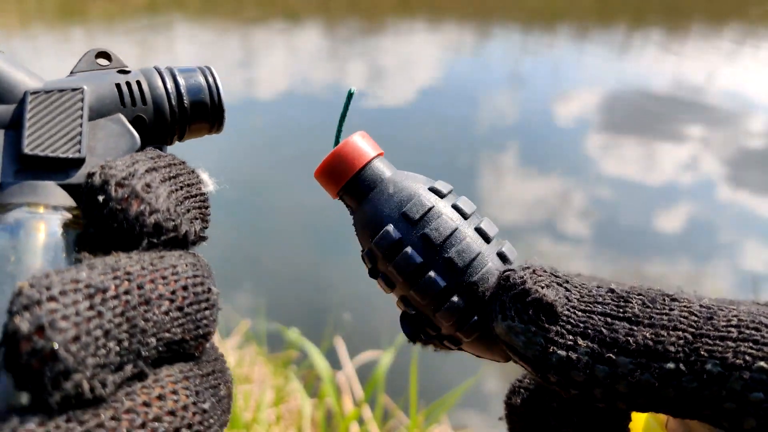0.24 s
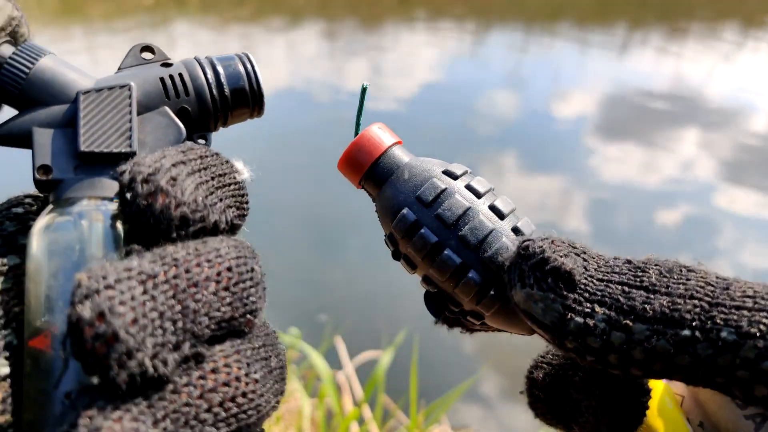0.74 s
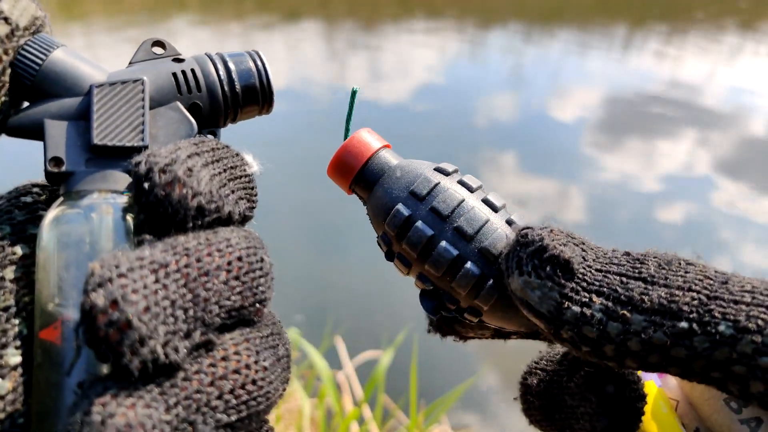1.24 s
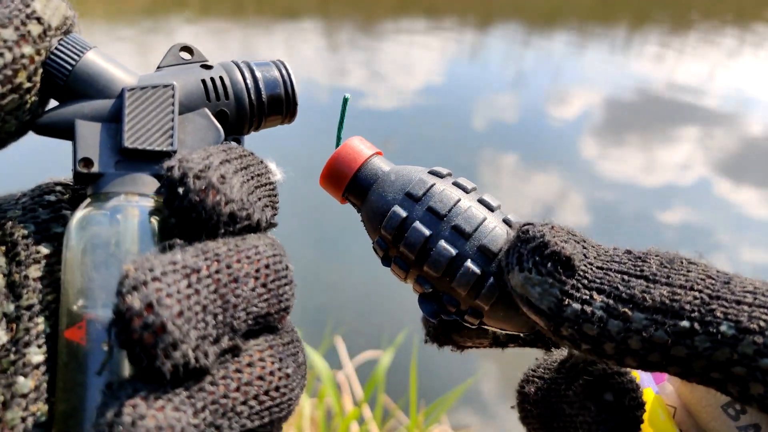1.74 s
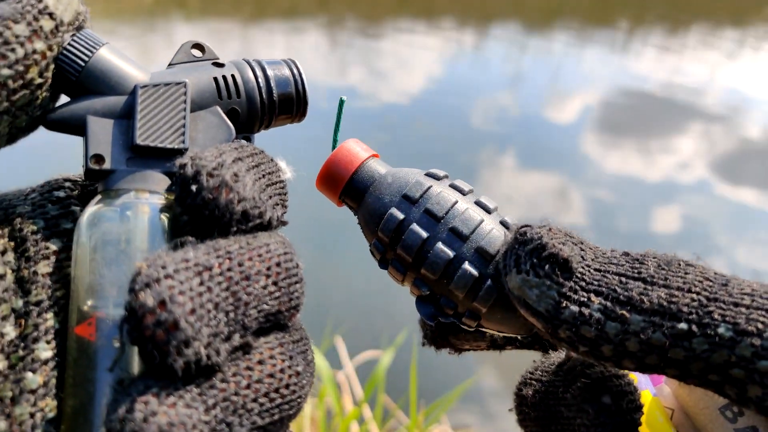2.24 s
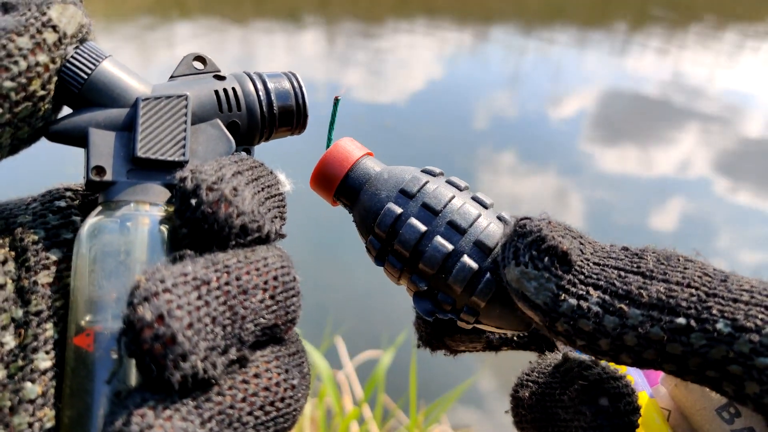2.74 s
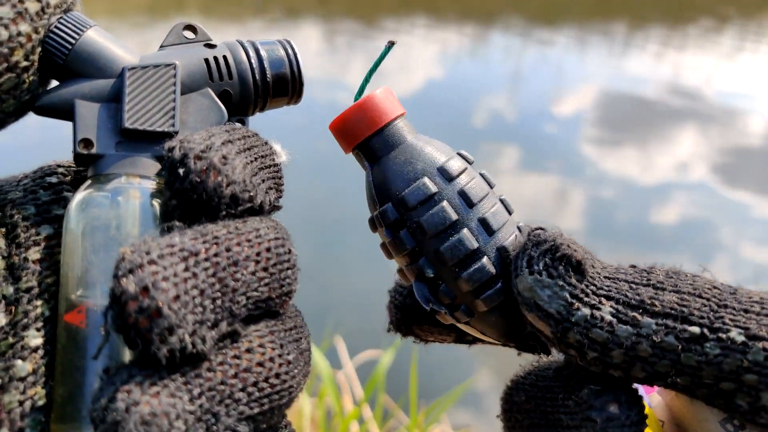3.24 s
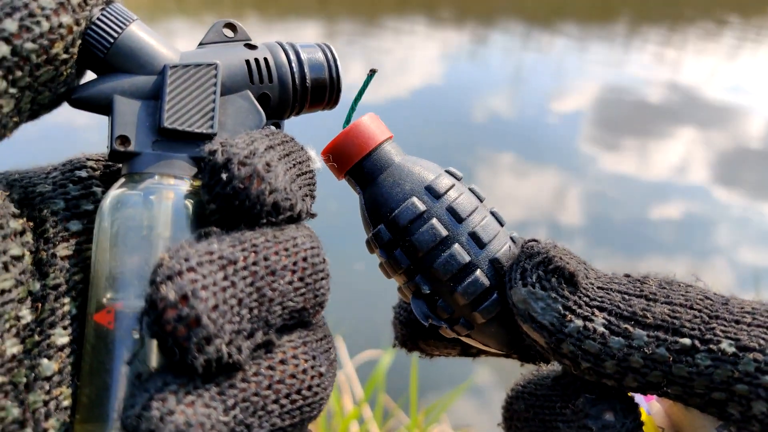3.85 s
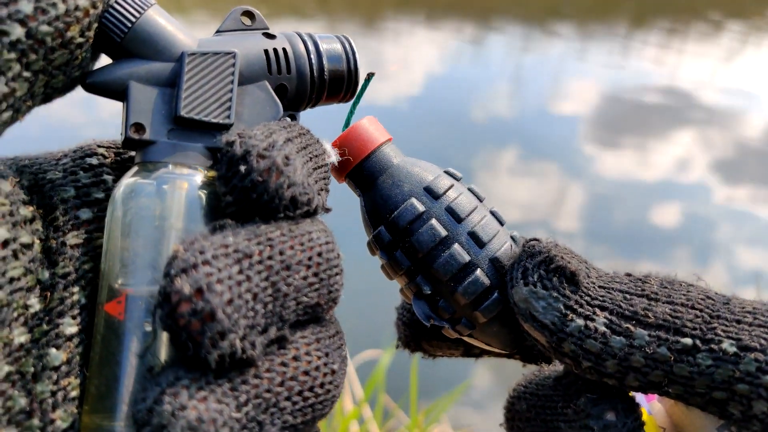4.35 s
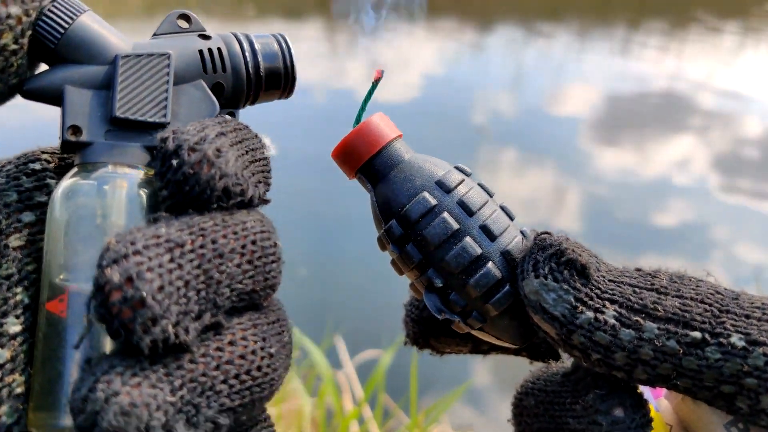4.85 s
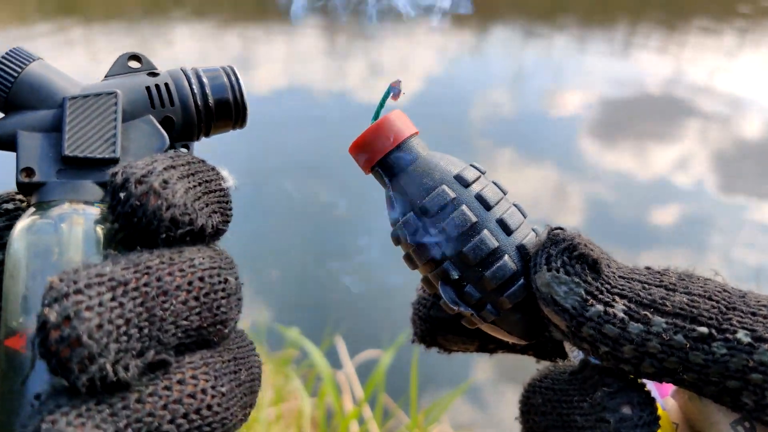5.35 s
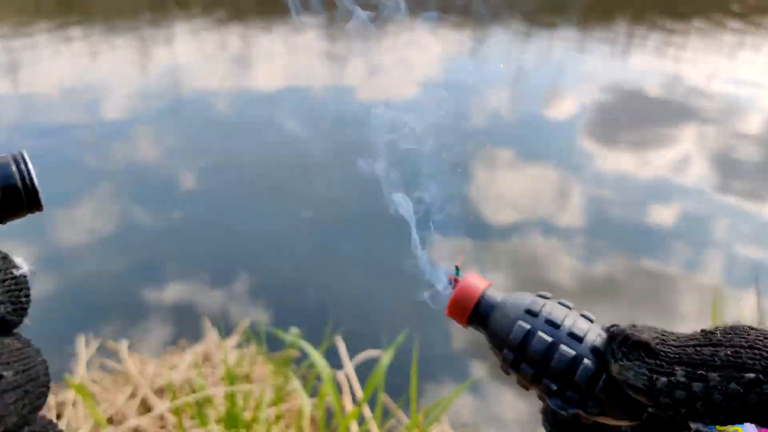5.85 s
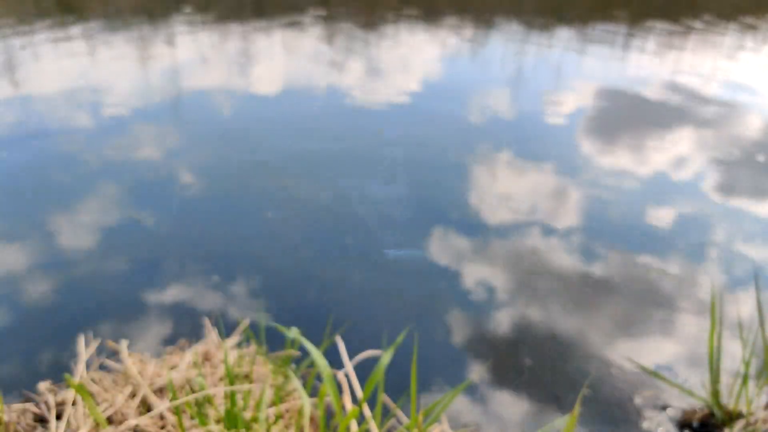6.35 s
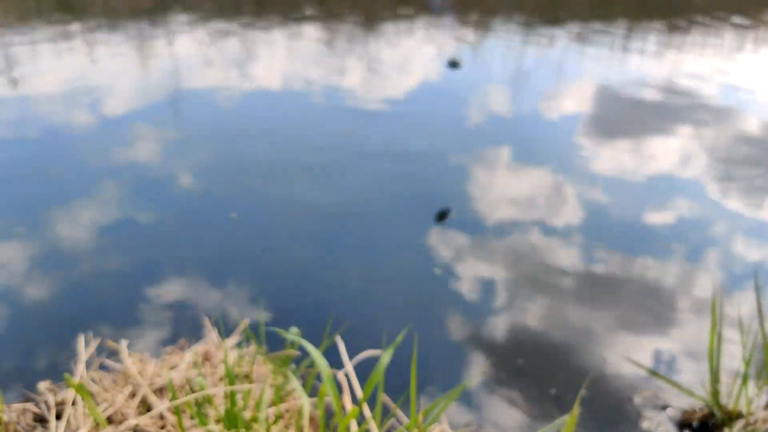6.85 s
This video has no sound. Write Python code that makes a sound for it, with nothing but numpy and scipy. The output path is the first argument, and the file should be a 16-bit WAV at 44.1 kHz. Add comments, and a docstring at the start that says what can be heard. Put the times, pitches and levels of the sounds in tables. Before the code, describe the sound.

Close outdoors, a gas torch ignites and roars, a fuse crackles and whooshes away, then a small splash, with soft wind rumble.

```python
"""On a river bank, a butane jet lighter lights the fuse of a firecracker close to a pair of microphones.
The trigger ticks ring the lighter's modes, unlit gas hisses twice as coloured noise, the igniter snaps.
The jet roars as fluttering noise and tears as dense random pops, steadier while it rests on the fuse.
The fuse fizzes in tiny pops, is swung to the right and thrown, rushing as swelling noise, then plops
into the water as noise slaps and ringing bubbles. Slow noise gusts of wind cover a far two-tone drone."""
import sys
import numpy as np
from scipy import signal
from scipy.fft import rfft, irfft, next_fast_len
from scipy.io import wavfile
from scipy.ndimage import map_coordinates

SR = 44100
rng = np.random.default_rng(int(sys.argv[2]) if len(sys.argv) > 2 else 0)


def inscribe(sig):
    """Save sig as 16-bit PCM at rate SR to the path in sys.argv[1].

    A 1-D sig is mono; a 2-D sig holds one channel per row.
    Samples are clipped to [-1, 1] before scaling.
    """
    pcm = np.round(np.clip(np.atleast_2d(sig).T, -1, 1) * 32767)
    wavfile.write(sys.argv[1], SR, pcm.astype(np.int16))


N = 313135
TIME = np.arange(N) / SR
SIZE = next_fast_len(N)
BIN_HZ = np.arange(SIZE // 2 + 1) * SR / SIZE

# jet: lit and out, then meeting and leaving the fuse, with their fade times
LIT_S, OUT_S, IGNITE_S, DIE_S = 1.144, 5.39, 0.046, 0.028
TOUCH_S, LEAVE_S, SETTLE_S = 3.46, 4.64, 0.022

# Equal spectrum at both microphones. Each row: frequency in Hz, left-right difference in dB.
EVEN_SHADE = [(20, 0), (20000, 0)]
# Likeness of the channels for a near source. Each row: frequency in Hz, shared power from 0 to 1.
NEAR_LIKENESS = [(200, 1), (1200, 0.88), (2700, 0.99), (3500, 1), (6000, 0.26), (10000, 0.5), (16000, 0.6)]


def from_db(db):
    """Decibels to gain."""
    return 10 ** (np.asarray(db) / 20)


def rms_one(x):
    """Scale to unit rms."""
    return x / np.sqrt(np.mean(x ** 2) + 1e-20)


def in_time(rows):
    """The columns of a time curve, interpolated at every sample."""
    s, *columns = np.transpose(rows)
    return [np.interp(TIME, s, c) for c in columns]


def levels(rows):
    """Gains from dB columns, dying quickly outside the curve's span."""
    outside_s = np.maximum(rows[0][0] - TIME, 0) + np.maximum(TIME - rows[-1][0], 0)
    return [from_db(db) * np.exp(-outside_s / 0.042) for db in in_time(rows)]


def at_bins(points):
    """A table over log frequency, read at every frequency bin."""
    hz, value = np.transpose(points)
    return np.interp(np.log(BIN_HZ + 1), np.log(hz), value)


def drift(rate_hz):
    """Slow random wander of rms 1."""
    spectrum = rfft(rng.standard_normal(SIZE)) / (1 + (BIN_HZ / rate_hz) ** 2)
    return rms_one(irfft(spectrum, SIZE)[:N])


def held(start_s, end_s, attack_s, release_s):
    """A gain rising smoothly around start, holding near 1 and falling around end."""
    rise = 1 + np.tanh((TIME - start_s) / attack_s)
    fall = 1 - np.tanh((TIME - end_s) / release_s)
    return rise * fall / 4


def swell(s, sigma_s):
    """A bell-shaped gain around one moment."""
    return np.exp(-.5 * ((TIME - s) / sigma_s) ** 2)


def coloured(source, colour, likeness, shade):
    """A source given a spectrum, each microphone adding scattered sound of its own; rms 1."""
    alike = np.clip(at_bins(likeness), 0, 1)
    scattered = rfft(rng.standard_normal((2, SIZE)))
    pair = np.sqrt(alike) * rfft(source, SIZE) + np.sqrt(1 - alike) * scattered
    side_db = at_bins(shade) * np.array([[.5], [-.5]])
    return rms_one(irfft(pair * from_db(at_bins(colour) + side_db), SIZE)[:, :N])


def turbulence(colour, likeness, shade=EVEN_SHADE):
    """Stereo noise of a given spectrum, partly shared by the channels; rms 1."""
    return coloured(rng.standard_normal(N), colour, likeness, shade)


def crackle(per_s, spread_db):
    """One-sided pressure pops at random moments, a few much larger than the rest; rms 1."""
    pops = (rng.random(N) < per_s / SR) * from_db(spread_db * np.minimum(rng.exponential(1, N), 4))
    return rms_one(pops.mean() - pops)


def place(pair, lag_ms, pan_db):
    """Bearing: positive values bring the sound to the right microphone later and weaker."""
    lag = lag_ms * SR / 1000
    right = map_coordinates(pair[1], [np.arange(N) - lag], order=3)
    return np.array([pair[0] * from_db(pan_db / 2), right * from_db(-pan_db / 2)])


def band(x, low_hz, high_hz):
    """Gentle causal band-pass."""
    sos = signal.butter(2, [low_hz, min(high_hz, .45 * SR)], "band", fs=SR, output="sos")
    return signal.sosfilt(sos, x + 1e-18)


def ring(x, hz, t60_s):
    """A unit click sets a decaying sine of initial height 1 ringing."""
    r, w = from_db(-60 / (t60_s * SR)), 2 * np.pi * hz / SR
    return signal.lfilter([0, np.sin(w)], [1, -2 * r * np.cos(w), r * r], x + 1e-18)


def clicks(times_s, db):
    """One impulse for each event."""
    out = np.zeros(N)
    out[np.clip(np.round(np.asarray(times_s) * SR).astype(int), 0, N - 1)] = from_db(db)
    return out


def burst(hits, t60_s):
    """Each impulse starts a puff of noise that dies away."""
    envelope = signal.lfilter([1], [1, -from_db(-60 / (t60_s * SR))], hits + 1e-18)
    return envelope * rng.standard_normal((2, N))


def river_bank():
    """Open air as diffuse noise, and the two wavering tones of a far engine."""
    # Air spectrum. Each row: frequency in Hz, relative level in dB.
    air_colour = [(30, 8), (100, -0.5), (200, -7), (450, -14.5), (900, -18.5), (2000, -19.5), (5000, -26.5),
                  (10000, -31), (16000, -26)]
    # Likeness of the channels. Each row: frequency in Hz, shared power from 0 to 1.
    diffuse_likeness = [(50, 1), (300, 0.55), (1000, 0.024), (16000, 0.024)]
    # Lower drone tone. Each row: time in seconds, frequency in Hz, mean level in dB.
    drone_curve = [(0, 47.1, -40), (.9, 47.5, -53), (1.4, 48.25, -42), (2.0, 48.05, -36.5),
                   (2.3, 48.94, -34.5), (3.3, 49.1, -36.5), (4.0, 50.6, -40), (4.6, 49.83, -42),
                   (5.1, 51.84, -39), (5.7, 51.03, -37), (6.3, 52.26, -42.5), (7.1, 51.1, -46)]
    out = from_db(-48.5) * turbulence(air_colour, diffuse_likeness)
    upper_tone = (77.2 + 1.79 * drift(rate_hz=1.6), -50.5)
    for hz, db in (in_time(drone_curve), upper_tone):
        gain = np.sqrt(2) * from_db(db + 1.2 * drift(rate_hz=6.5))
        out = out + gain * np.sin(2 * np.pi * np.cumsum(hz) / SR)
    return out


def wind():
    """Lumpy pressure on the microphones; the crest of each gust buffets them more sharply."""
    # Gusts. Each row: crest in seconds, bell sigma in seconds, level in dB, buffet level in dB,
    # left-right difference in dB.
    gust_rows = [(0.296, 0.1, -31, -29, -4), (0.753, 0.1, -32, -35, -9), (0.955, 0.063, -31.5, -38, 5),
                 (1.704, 0.03, -36, -30, -11), (1.93, 0.073, -29, -43, -6), (2.443, 0.033, -43, -50, -1),
                 (2.896, 0.13, -38.5, -48, -10.5), (5.218, 0.12, -30.5, -47, -6),
                 (6.358, 0.039, -30.5, -54, -5), (6.602, 0.03, -43, -55, -6)]
    # Breeze between gusts. Each row: time in seconds, level in dB.
    breeze_curve = [(0, -42), (1.0, -35), (1.1, -39), (1.5, -39.5), (1.7, -33.5), (2.3, -40), (3.2, -40.5),
                    (4.0, -52), (5.4, -44), (5.9, -57), (6.5, -49), (7.1, -52)]
    # Wind spectrum. Each row: frequency in Hz, relative level in dB.
    wind_colour = [(10, -4), (25, -1), (45, -2.5), (70, -10), (120, -25.5), (250, -40), (600, -44.5),
                   (2000, -90)]
    # Buffet spectrum. Each row: frequency in Hz, relative level in dB.
    buffet_colour = [(15, -5.5), (80, -2.5), (130, -12.5), (250, -31), (700, -40), (2000, -89)]
    # Likeness of the channels. Each row: frequency in Hz, shared power from 0 to 1.
    gusty_likeness = [(20, 0.52), (300, 0.35)]
    crest_share = 0.15  # crest sigma / gust sigma
    breeze_pan_db = -4
    gust, crest = 0, 0
    for s, sigma_s, db, crest_db, pan_db in gust_rows:
        sides = from_db([[pan_db / 2], [-pan_db / 2]])
        gust = gust + sides * from_db(db) * swell(s, sigma_s)
        crest = crest + sides * from_db(crest_db) * swell(s, crest_share * sigma_s)
    (breeze_db,) = in_time(breeze_curve)
    breeze = from_db(breeze_db + breeze_pan_db * np.array([[.5], [-.5]]))
    pressure = np.hypot(gust, breeze) * turbulence(wind_colour, gusty_likeness)
    return pressure + crest * turbulence(buffet_colour, gusty_likeness)


def lighter_body(hits):
    """Contacts ring the lighter's short-lived modes, in a mix that shifts with the grip."""
    # Body modes. Each row: frequency in Hz, mean relative level in dB, t60 in seconds.
    body_modes = [(2320, -4.5, 0.006), (2590, -5.5, 0.0083), (3350, -4, 0.0056), (3900, -3, 0.0054),
                  (5300, -8, 0.007), (5740, -9, 0.0038), (6700, -7, 0.0088), (9230, -8, 0.0067),
                  (9700, -3, 0.0048), (12500, -8, 0.006), (14900, -2.5, 0.0036)]
    moments_s = np.linspace(0, N / SR, num=60)
    out = 0
    for k, (hz, db, t60_s) in enumerate(body_modes):
        grip_db = np.interp(TIME, moments_s, rng.standard_normal(len(moments_s)))
        out = out + (-1) ** (k // 5) * ring(hits * from_db(db + grip_db), hz, t60_s)
    return out


def trigger():
    """Small ticks ring the body, each with a dry scuff of plastic and a faint knock."""
    # Trigger and valve ticks. Each row: time in seconds, strength in dB,
    # left-right difference in dB before the common pan.
    tick_rows = [(0.1188, -17, 4), (0.1466, -28.5, 4), (0.438, -22, 4), (0.6697, -32, 4), (0.749, -36, 3),
                 (0.763, -33, 3), (0.789, -25.5, 0), (.845, -20.5, 2.5), (0.9035, -21.5, 9),
                 (1.104, -33, -16)]
    s, db, pan_db = np.transpose(tick_rows)
    hits = np.array([clicks(s, db + pan_db / 2), clicks(s, db - pan_db / 2)])
    body = from_db(-8) * lighter_body(hits)
    scuff = from_db(-4.0) * band(burst(hits, t60_s=0.012), 2070, 6600)
    knock = from_db(-6.5) * band(burst(hits, t60_s=0.015), 270, 1300)
    return place(body + scuff + knock, lag_ms=0.363, pan_db=1.0)


def unlit_gas():
    """Gas hisses from the nozzle as noise while the valve is held open."""
    # Valve openings. Each row: start in seconds, length in seconds, level in dB.
    leak_rows = [(0.119, 0.4, -49.5), (0.839, 0.23, -48)]
    # Leak spectrum. Each row: frequency in Hz, relative level in dB.
    leak_colour = [(1500, -11), (2400, -7), (4200, -4), (5600, -2.5), (7400, 3), (8900, -7), (9900, 4),
                   (11300, -9), (13500, -2), (16000, -12)]
    # Shading at the microphones. Each row: frequency in Hz, left-right difference in dB.
    leak_shade = [(2500, 4), (6200, -4), (7600, 6), (9000, -5), (10200, -5), (11200, 0), (13000, -6)]
    flow = sum(from_db(db) * held(s, s + length_s, attack_s=0.018, release_s=0.029)
               for s, length_s, db in leak_rows)
    return place(flow * turbulence(leak_colour, NEAR_LIKENESS, leak_shade), lag_ms=0.357, pan_db=1.5)


def igniter():
    """The piezo hammer cracks and rings the body, and the grip thuds."""
    # Latch, hammer and rebound. Each row: time in seconds, strength in dB.
    snap_rows = [(1.0565, -32), (1.0606, 1), (1.0620, -13)]
    hits = clicks(*np.transpose(snap_rows))
    crack = from_db(-6.0) * band(lighter_body(hits), 2100, 25000)
    crack = crack + from_db(-14) * band(burst(hits, t60_s=0.01), 2200, 20000)
    tail = from_db(-34.0) * band(burst(hits, t60_s=0.064), 300, 16000)
    jolt = from_db(-24.5) * ring(hits, hz=169, t60_s=0.03)
    jolt -= from_db(-23.5) * ring(hits, hz=280, t60_s=0.0195)
    jolt += from_db(-23.5) * ring(hits, hz=484, t60_s=0.019)
    thud = from_db(-10.0) * band(hits, 300, 1300)
    return place(crack + tail, lag_ms=0.226, pan_db=-10.0) + jolt + thud


def torch():
    """The jet roars low and tears in fine crackle, with brief lulls; resting on the fuse steadies it."""
    # Flame strength. Each row: time in seconds, relative level in dB.
    thrust_curve = [(1.15, -2), (1.32, -2), (1.46, 0.5), (1.55, 2), (1.8, -1), (2.02, 1.5), (2.2, 1),
                    (2.4, 1), (2.52, -0.5), (2.68, 1), (2.9, 0), (3.05, -1), (3.15, 2), (3.4, 2), (3.6, 1),
                    (4.05, 0), (4.2, 1.5), (4.35, -.5), (4.52, -1), (4.7, 1.5), (4.75, -2.5), (4.83, 0.5),
                    (5.15, -2), (5.35, 4)]
    # Nozzle hiss. Each row: time in seconds, level in dB.
    nozzle_curve = [(1.15, -46), (1.5, -45.5), (3.4, -41), (4.0, -44.5), (4.8, -43.5), (5.35, -42)]
    # Flame bearing, shifting as it meets the fuse. Each row: time in seconds, right lag in ms.
    flame_path = [(3.46, 0.19), (3.56, 0.17), (4.25, 0.16), (4.45, 0.15), (4.66, 0.17), (4.92, 0.17)]
    # Brief changes of tearing. Each row: centre in seconds, length in seconds,
    # nominal depth in dB (negative swells).
    lull_rows = [(1.191, 0.0069, 8), (1.285, 0.019, 5), (1.332, 0.017, 7), (1.504, 0.02, 10),
                 (1.584, 0.11, 8), (1.703, 0.015, 10), (1.772, 0.028, 2), (1.888, 0.033, 4.5),
                 (1.968, 0.065, 12.5), (2.059, 0.028, 9), (2.186, 0.056, 11), (2.289, 0.02, 11),
                 (2.356, 0.028, 6.5), (2.52, 0.016, 5.5), (3.07, 0.018, 6), (3.23, 0.13, 7.5),
                 (5.192, 0.033, -1)]
    # Roar spectrum. Each row: frequency in Hz, relative level in dB.
    roar_colour = [(100, -12.5), (250, -13), (450, -4.5), (700, 1), (1200, 1), (1700, -7), (2300, -17),
                   (3200, -46), (5000, -52), (9000, -31)]
    # Free tearing spectrum. Each row: frequency in Hz, relative level in dB.
    rasp_colour = [(700, -6), (1600, 0.5), (2350, 4.5), (2750, 6.5), (3400, 4), (4100, -2), (5200, 1.5),
                   (6200, -2.5), (7000, -5.5), (7600, -4), (8500, -13), (11000, -12.5), (16000, -35)]
    # Free flame likeness. Each row: frequency in Hz, shared power from 0 to 1.
    flame_likeness = [(200, 1), (1200, 0.98), (2400, 0.58), (2660, 1), (2820, 1), (3100, 0.83), (4000, 1),
                      (6000, 0.58), (7000, 0.43), (8600, 1), (16000, .2)]
    # Shading by hand and lighter, free flame. Each row: frequency in Hz, left-right difference in dB.
    flame_shade = [(200, 7), (450, 5.5), (750, 3.5), (1350, 2), (2350, 8), (2650, 1), (2850, 4), (3100, 3),
                   (3750, 9), (5000, 3.5), (6300, 1), (7000, 4), (9000, 2)]
    # Steadied tearing spectrum. Each row: frequency in Hz, relative level in dB.
    steadied_colour = [(1500, -1), (2700, 7), (3100, -13), (3600, 9), (4100, -3.5), (5200, 2.5), (6000, -2),
                       (7800, -5), (9000, -14), (16000, -26)]
    # Steadied flame likeness. Each row: frequency in Hz, shared power from 0 to 1.
    steadied_likeness = [(200, 0.94), (1200, 1), (2400, 0.66), (2850, 1), (3450, 1), (4100, 1),
                         (4500, 0.64), (6000, 0.51), (7200, 0.39), (9000, 0.96), (16000, .2)]
    # Shading of the steadied flame. Each row: frequency in Hz, left-right difference in dB.
    steadied_shade = [(750, 2), (1350, 1.5), (2300, 6), (2650, 2), (3400, 2.5), (3700, 4), (4500, 3.5),
                      (5500, 0.5), (6500, 0), (7000, 5), (9000, 2)]
    # Spectrum of the stream on the fuse's tip. Each row: frequency in Hz, relative level in dB.
    impinge_colour = [(600, -11), (1200, 11), (1800, 6.5), (2700, 8), (3700, -3), (4500, -3), (5500, -11),
                      (7500, -13), (9500, -14), (12000, -24)]
    # Nozzle hiss spectrum. Each row: frequency in Hz, relative level in dB.
    nozzle_colour = [(3000, -32), (7000, -22), (8900, -33), (10900, -8.5), (12400, 0.5), (14500, 1),
                     (16000, -3)]
    # Shading of the nozzle. Each row: frequency in Hz, left-right difference in dB.
    nozzle_shade = [(9000, -16), (11000, -3), (12500, -12), (16000, -10)]
    leave_fade_s, catch_s = 0.033, 4.38
    clear_s, clear_fade_s = 4.82, 0.11  # the flame draws clear of the fuse
    steadied_flutter, lull_roar_share = 0.45, 0.25

    (thrust_db,), (nozzle_db,), (lag_ms,) = in_time(thrust_curve), in_time(nozzle_curve), in_time(flame_path)
    lit = held(LIT_S, OUT_S, IGNITE_S, DIE_S)
    resting = held(TOUCH_S, LEAVE_S, SETTLE_S, leave_fade_s)
    burning = held(LEAVE_S, OUT_S, leave_fade_s, DIE_S)
    near_fuse = held(TOUCH_S, clear_s, SETTLE_S, clear_fade_s)
    lull_db = sum(depth_db * held(s - length_s / 2, s + length_s / 2, attack_s=0.0084, release_s=0.0019)
                  for s, length_s, depth_db in lull_rows)
    flutter = rms_one(band(rng.standard_normal(N), low_hz=9, high_hz=45))
    flutter = flutter * (1 - (1 - steadied_flutter) * (resting + burning))

    roar_db = -36.5 + 1.65 * flutter - 6.5 * resting - 1.5 * burning - lull_roar_share * lull_db
    roar = from_db(thrust_db + roar_db) * turbulence(roar_colour, flame_likeness, flame_shade)
    rasp_db = -35.5 + 1.18 * flutter - 8 * resting - 2.5 * burning - lull_db
    pops = crackle(per_s=7000, spread_db=3.0)
    free = (1 - near_fuse) * coloured(pops, rasp_colour, flame_likeness, flame_shade)
    steadied = near_fuse * coloured(pops, steadied_colour, steadied_likeness, steadied_shade)
    tearing = from_db(thrust_db + rasp_db) * (free + steadied)

    impinge = from_db(-40.5) * held(TOUCH_S, catch_s, SETTLE_S, SETTLE_S)
    on_fuse = impinge * turbulence(impinge_colour, steadied_likeness, steadied_shade)
    hiss = from_db(nozzle_db) * turbulence(nozzle_colour, NEAR_LIKENESS, nozzle_shade)
    flame = place(lit * (roar + tearing) + on_fuse, lag_ms, pan_db=-3.0)
    return flame + place(lit * hiss, lag_ms=0.199, pan_db=4.5)


def tears():
    """The free flame tears now and then with a lone one-sided pressure pulse."""
    size_db = -27 + 3 * np.minimum(rng.exponential(1, N), 2)
    pulses = (rng.random(N) < 14 / SR) * from_db(size_db)  # 14 per second on average
    pops = -signal.lfilter([1], [1, -.6], pulses + 1e-18) * held(LIT_S, TOUCH_S, IGNITE_S, SETTLE_S)
    return place(np.array([pops, pops]), lag_ms=0.17, pan_db=4)


def spits():
    """Flame and sparks spit as short band-limited noise puffs."""
    # Spits. Each row: time in seconds, strength in dB.
    spit_rows = [(2.004, -25), (2.009, -13), (2.404, -17), (3.0926, -17), (4.829, -19), (4.9282, -15),
                 (4.9790, -18), (5.2775, -8), (5.283, -6), (5.3493, -4.5)]
    puffs = burst(clicks(*np.transpose(spit_rows)), t60_s=0.0084)
    return place(from_db(-10.5) * band(puffs, 1500, 9100), lag_ms=0.18, pan_db=-5)


def water_echo(pair):
    """In flight the water's echo falls ever further behind, combing the sound with falling stripes."""
    flight_s = np.maximum(TIME - 6.6, 0)  # thrown at 6.6 s
    late_s = (0.785 + 13.3 * flight_s ** 2) / 1000
    gain = 0.35 * np.clip(flight_s / 0.13, 0, 1)
    return gain * np.array([np.interp(TIME - late_s, TIME, side) for side in pair])


def fuse():
    """The coating flares, powder burns in dense tiny pops, and the flame rushes when swung through air."""
    # Burning powder. Each row: time in seconds, reference level in dB.
    fizz_curve = [(4.6, -49), (5.35, -44.5), (5.8, -45.5), (6.15, -48.5), (6.32, -49.5), (6.5, -56),
                  (6.73, -49.5), (6.98, -50.5)]
    # Fuse bearing. Each row: time in seconds, right lag in ms, left-right difference in dB.
    fuse_path = [(4.6, 0.18, 0.5), (5.4, 0.15, 0.5), (5.8, 0.12, -1), (6.1, -0.091, -3.5),
                 (6.35, -0.22, -3), (6.7, -0.24, -1.5), (7.0, -0.12, -3)]
    # Swings, then flight. Each row: centre in seconds, bell sigma in seconds,
    # reference level in dB, bright part relative to it in dB.
    swing_rows = [(5.423, 0.13, -47, -0.5), (5.749, 0.089, -53, -6.5), (5.95, 0.048, -45.5, -3),
                  (6.137, 0.054, -49, -3), (6.337, 0.061, -44, -4.5), (6.643, 0.099, -45, -1.5),
                  (6.745, 0.054, -42, 2), (6.808, 0.022, -48, -17), (6.91, 0.037, -39, -7)]
    # Fizz spectrum. Each row: frequency in Hz, relative level in dB.
    fizz_colour = [(500, -0.5), (2200, -17), (3500, -5), (5300, 1), (7000, 1.5), (9300, 2), (11000, -1.5),
                   (13500, 3.5), (16000, -1)]
    # Low rush spectrum. Each row: frequency in Hz, relative level in dB.
    rush_low_colour = [(120, 1.5), (300, -3.5), (650, -0.5), (1100, -3), (2000, -10), (5000, -33)]
    # Bright rush spectrum. Each row: frequency in Hz, relative level in dB.
    rush_colour = [(600, -38), (1500, -1.5), (2800, 3), (4500, 1), (7000, -7), (15000, -10.5)]
    # Rush likeness. Each row: frequency in Hz, shared power from 0 to 1.
    moving_likeness = [(200, 0.95), (800, 0.85), (2000, 0.2), (5000, 0.19), (16000, .3)]
    # Soft coating flame spectrum. Each row: frequency in Hz, relative level in dB.
    flare_colour = [(90, -5), (180, -1.5), (350, 1), (600, 7), (900, 7), (1400, -34), (4000, -47)]
    # Spectrum of the low puff as the coating catches. Each row: frequency in Hz, relative level in dB.
    puff_colour = [(70, 2.5), (150, -7), (350, -2), (600, -12), (1500, -39)]

    (fizz,), (lag_ms, pan_db) = levels(fizz_curve), in_time(fuse_path)
    sputter = drift(rate_hz=16)
    pops = crackle(per_s=6500, spread_db=4.5)
    sparks = fizz * from_db(2.5 + 1.74 * sputter) * coloured(pops, fizz_colour, NEAR_LIKENESS, EVEN_SHADE)

    # even at rest the flame rushes a little
    low, bright = fizz * from_db(-8), fizz * from_db(-16.5)
    for s, sigma_s, db, bright_db in swing_rows:
        low = low + from_db(db) * swell(s, sigma_s)
        bright = bright + from_db(db + bright_db) * swell(s, sigma_s)
    low_flicker = from_db(-4.5 + 2.5 * drift(rate_hz=24))
    whoosh = low_flicker * low * turbulence(rush_low_colour, moving_likeness)
    whoosh = whoosh + from_db(1.0) * bright * turbulence(rush_colour, moving_likeness)
    whoosh = whoosh * from_db(1.75 * sputter)

    flare_db = -36 - 12.5 * np.maximum(TIME - LEAVE_S, 0)  # fades 12.5 dB per second
    flare = held(4.77, OUT_S, SETTLE_S, DIE_S) * from_db(flare_db)
    flame = flare * turbulence(flare_colour, NEAR_LIKENESS)
    puff = from_db(-41) * swell(4.8, sigma_s=0.043) * turbulence(puff_colour, NEAR_LIKENESS)
    return place(sparks + whoosh + water_echo(whoosh) + flame + puff, lag_ms, pan_db)


def sparks_popping():
    """The larger grains of powder go off as single sharp pressure pulses."""
    # Grains. Each row: time in seconds, strength in dB.
    grain_rows = [(5.526, -30), (5.5763, -30), (5.595, -25), (5.6124, -28), (5.6905, -38), (5.768, -23),
                  (5.82, -22)]
    pops = from_db(9.0) * band(clicks(*np.transpose(grain_rows)), 2100, 16000)
    return place(np.array([pops, pops]), lag_ms=0.12, pan_db=7)


def scuffs():
    """The knitted glove rubs on the casing in short dull noise bursts."""
    # Rubs. Each row: time in seconds, strength in dB.
    scuff_rows = [(5.686, -44), (6.298, -46), (6.314, -34), (6.408, -32), (6.679, -24)]
    rubs = burst(clicks(*np.transpose(scuff_rows)), t60_s=0.035)
    return place(band(rubs, 302, 4000), lag_ms=-0.2, pan_db=-5.0)


def splash():
    """The surface is slapped and rings briefly; a trapped air pocket knocks twice as it closes."""
    # Entry and falling drops. Each row: time in seconds, slap strength in dB, bubble frequency in Hz,
    # bubble strength in dB, bubble t60 in seconds.
    plop_rows = [(7.0026, -14.5, 910, -12, 0.0095), (7.036, -42, 5310, -38, .012),
                 (7.048, -60, 1390, -45, 0.05), (7.066, -56, 998, -35.5, 0.0088),
                 (7.079, -45, 1280, -50, 0.055), (7.098, -44, 2500, -37, .02)]
    # Ring of the slap. Each row: frequency in Hz, relative level in dB, t60 in seconds.
    slap_modes = [(1330, -14, 0.011), (1640, -9, 0.016), (2724, -8, 0.011), (3610, -17, .012),
                  (5280, -12.5, .01), (7690, -14, 0.01)]
    out = np.zeros((2, N))
    for s, slap_db, hz, bubble_db, t60_s in plop_rows:
        hit = clicks(s, slap_db)
        out += from_db(3) * band(band(burst(hit, t60_s=0.018)[0], 1500, 3800), 1000, 6200)
        for k, (mode_hz, mode_db, mode_t60_s) in enumerate(slap_modes):
            out += (-1) ** k * ring(hit * from_db(mode_db), mode_hz, mode_t60_s)
        out += from_db(-3.0) * band(burst(hit, t60_s=0.022), 4100, 19000)
        out += from_db(-21.5) * band(burst(hit, t60_s=0.2), 1300, 8300)
        knocks = clicks([s, s + 0.0033], [bubble_db - 2.5, bubble_db])
        out += band(band(ring(knocks, hz, t60_s), 870, 8000), 800, 8000)
    return place(out, lag_ms=0, pan_db=-3.0)


def scene():
    """Everything at the two microphones."""
    out = river_bank() + wind() + trigger() + unlit_gas() + igniter()
    out = out + torch() + tears() + spits() + fuse()
    return out + sparks_popping() + scuffs() + splash()


def record(dry):
    """Soft overload rounds the peaks; a steep low-pass cuts the top."""
    low_pass = signal.ellip(10, .1, 80, 15750, fs=SR, output="sos")
    return signal.sosfilt(low_pass, .9 * np.tanh(dry / .9))


dry = scene()
out = record(dry)
inscribe(out)
```